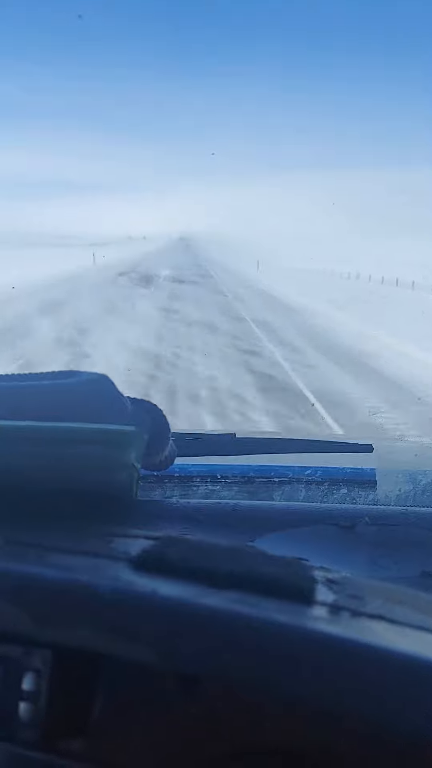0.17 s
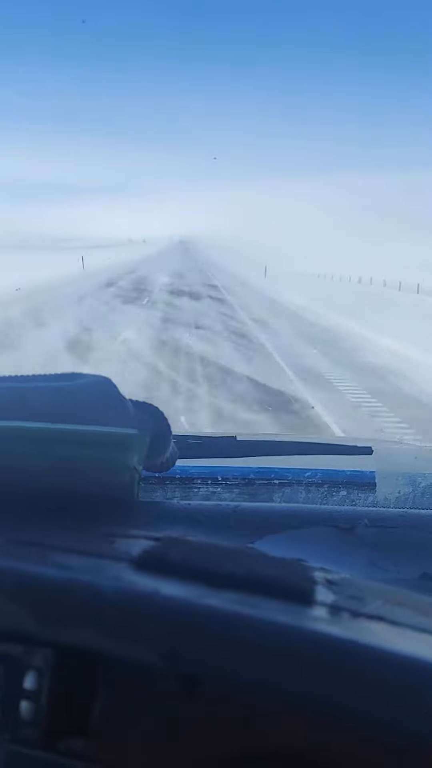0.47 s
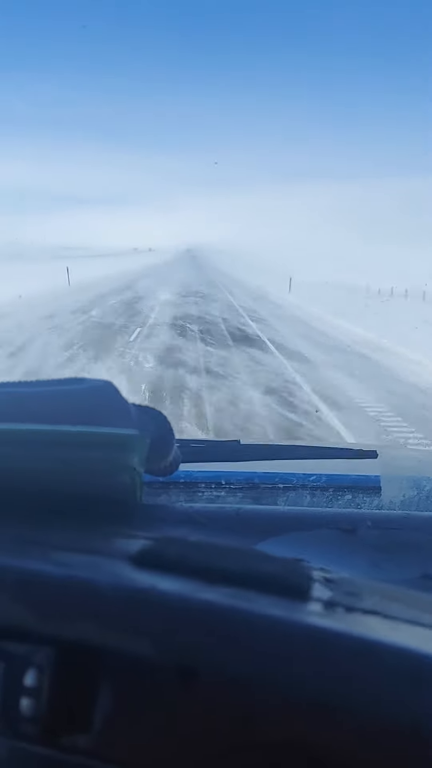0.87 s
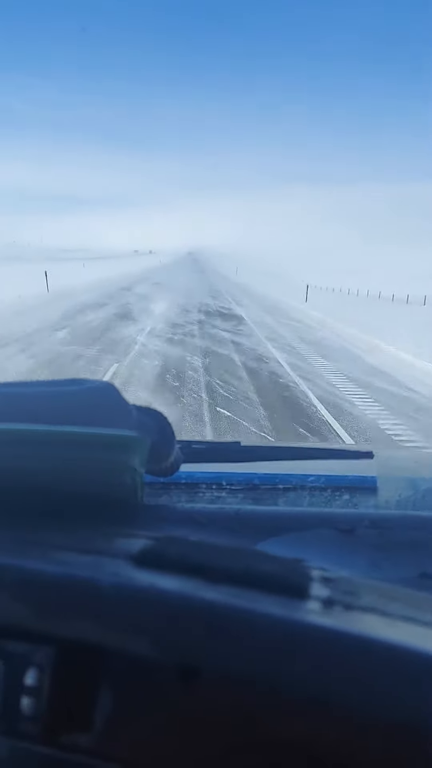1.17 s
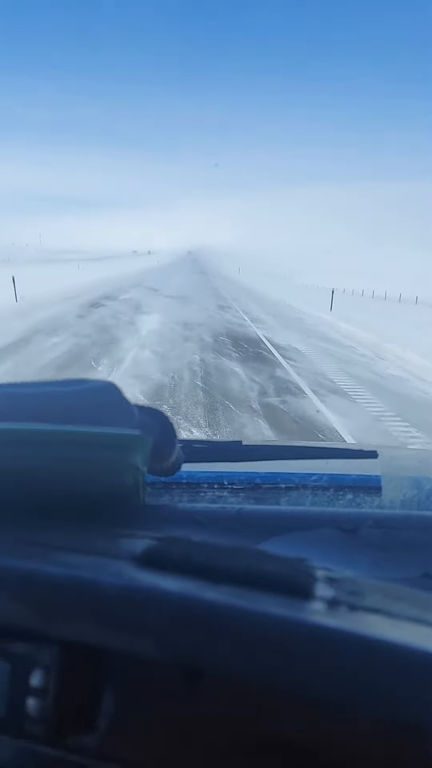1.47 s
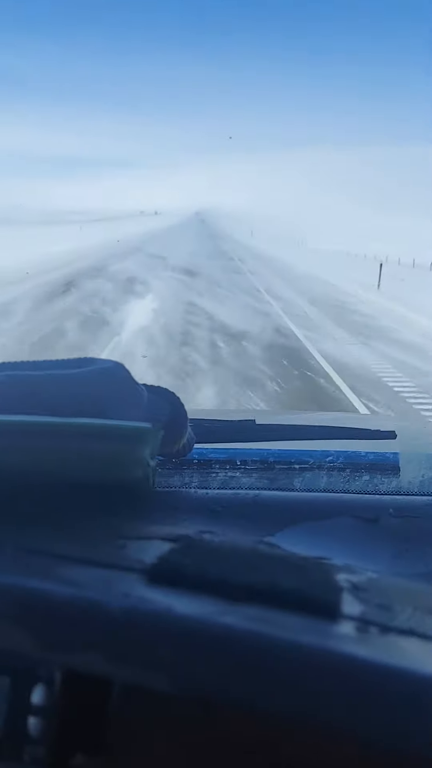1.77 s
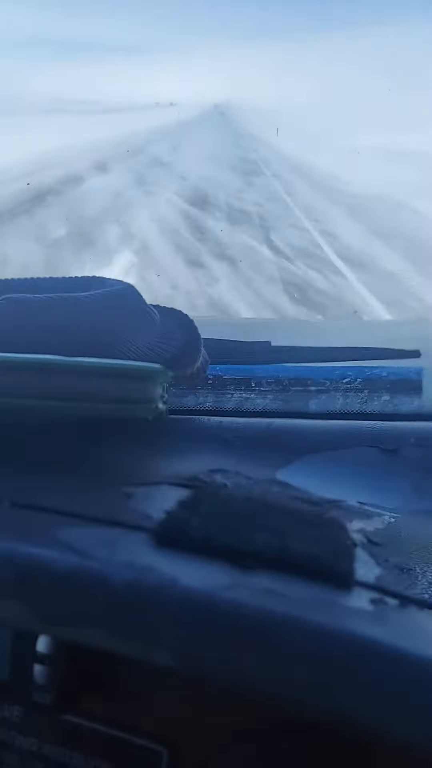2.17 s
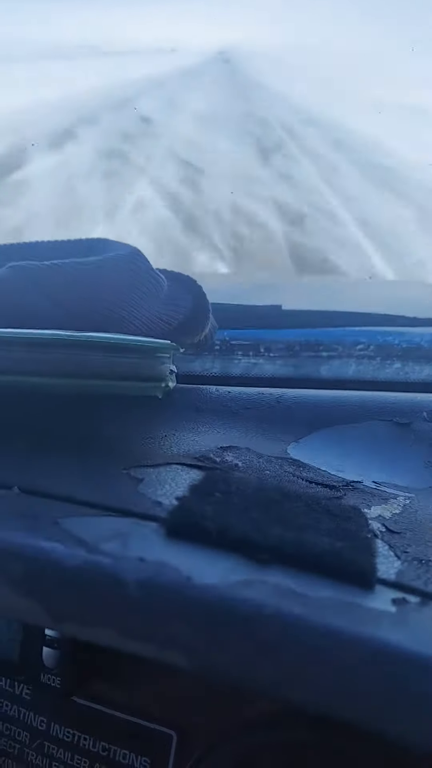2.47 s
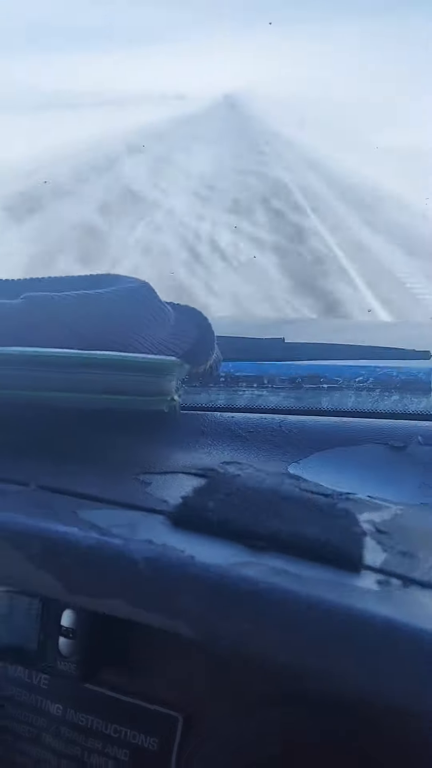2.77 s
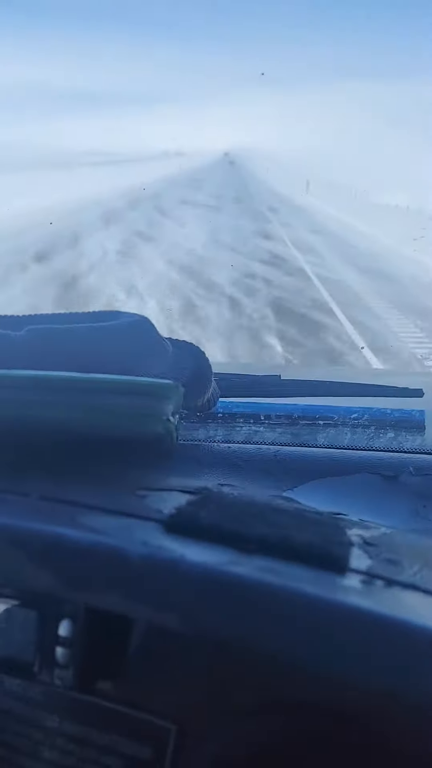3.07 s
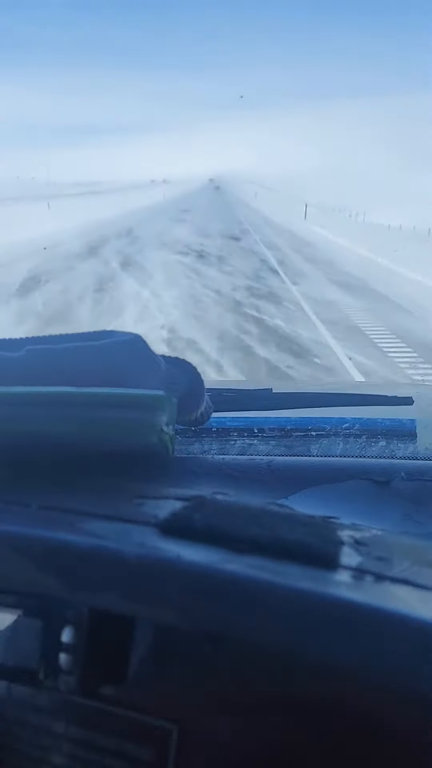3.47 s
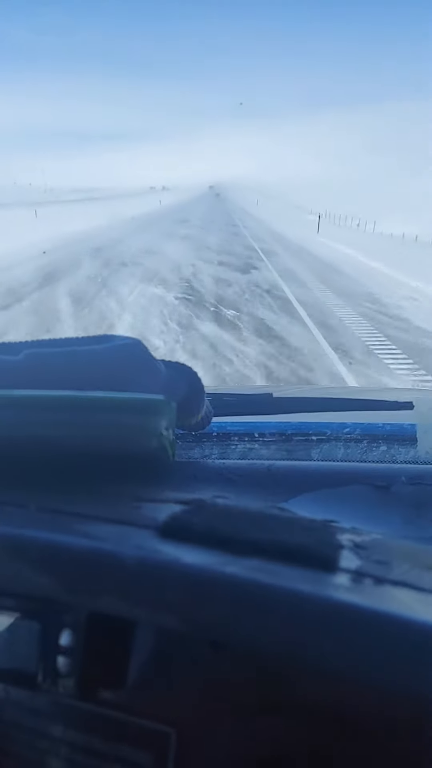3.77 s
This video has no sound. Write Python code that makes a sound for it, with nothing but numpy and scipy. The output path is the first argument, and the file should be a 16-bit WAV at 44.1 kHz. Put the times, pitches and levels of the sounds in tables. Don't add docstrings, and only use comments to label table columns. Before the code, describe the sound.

Steady low engine drone in a truck cab on a snowy road, with broad wind and tyre noise and faint hiss; later, close handling clicks and a single thump strike the stereo microphone's right side.

```python
import sys
import numpy as np
from scipy import signal
from scipy.fft import rfft, irfft, next_fast_len
from scipy.io import wavfile
from scipy.ndimage import uniform_filter1d, map_coordinates

SR = 44100
rng = np.random.default_rng(int(sys.argv[2]) if len(sys.argv) > 2 else 0)


def invert_db(x):
    u = np.asarray(x, float) / 20
    return 10 ** u


def master(y):
    cut = np.clip(np.atleast_2d(y).T, -1, 1)
    pcm = np.round(cut * 32767)
    wavfile.write(sys.argv[1], SR, pcm.astype(np.int16))


N = 172872

# time in seconds, turns per second in Hz.
CRANK_SPEED = [(0, 21.36), (2, 21.33), (3.92, 21.28)]
# pitch as a multiple of the crank turns, level in dB.
ENGINE_TONES = [(0.5, -48.5), (1, -40), (1.5, -27), (2, -22), (2.5, -25), (3, 0), (3.5, -21.5), (4, -22),
                (4.5, -14), (5, -14.5), (5.5, -18.5), (6, -27), (6.5, -21), (7, -14.5), (7.5, -18.5),
                (8, -22.5), (8.5, -24.5), (9, -18.5), (9.5, -29.5), (10, -29.5), (10.5, -33), (11, -26.5),
                (11.5, -27), (12, -24.5), (12.5, -32.5), (13, -32), (13.5, -42), (14, -37.5), (14.5, -46),
                (15, -44.5), (15.5, -30), (16, -27)]
# pitch as a multiple of the crank turns, level in dB.
HIGH_ENGINE_TONES = [(17, -32.5), (17.5, -30.5), (22.5, -33.5), (24, -35.5), (25.5, -36), (28.5, -41.5)]
# time in seconds, level in dB.
ROAD_LEVEL = [(.12, -29.5), (.2, -27.5), (.35, -29.5), (.55, -32), (.8, -34.5), (1.3, -34), (1.9, -32),
              (2.3, -34.5), (2.8, -36), (3.3, -34.5), (3.92, -34)]
# frequency in Hz, level in dB per Hz.
RUMBLE_COLOUR = [(25, -37.5), (45, 0.5), (60, 1.5), (85, -10.5), (110, -4), (165, -7), (215, -11),
                 (330, -33.5), (600, -64.5)]
# frequency in Hz, level in dB per Hz.
RUSH_COLOUR = [(150, -32.5), (250, -3), (300, -12.5), (500, -11.5), (700, -18.5), (1100, -20.5),
               (2300, -29), (3200, -39.5), (6000, -55.5)]
# frequency in Hz, level in dB per Hz.
HISS_COLOUR = [(1500, -20.5), (3000, 0.5), (4500, -1), (7500, -7.5), (10000, -15), (12500, -9.5),
               (15500, -27), (16500, -35)]
# frequency in Hz, width in Hz, boost in dB.
CAB_PANELS = [(476, 30, 4.5), (1030, 270, 2.5)]
# frequency in Hz, likeness from 0 to 1.
PORT_LIKENESS = [(60, 0.58), (150, 1), (380, 0.6), (950, 0.37), (2380, 0.02), (5980, 0.046), (15000, 0.066)]
# frequency in Hz, left minus right in dB.
PORT_LEAN = [(60, -0.5), (180, -1), (550, -1.5), (1650, -4), (4970, 0.5), (15000, 1)]
# start in seconds, level in dB, left minus right in dB, case resonance in Hz,
# brightness in dB per octave.
CASE_TICKS = [(1.6035, -42.5, -14, 3000, -5.5), (1.611, -28, -17.5, 6850, 0), (1.6222, -34, -16, 4000, -7),
              (1.6273, -42, -18, 14000, 0), (1.6578, -43, -6, 4200, 0), (1.704, -44, -5, 3420, -3),
              (1.751, -43, -16, 7500, 2), (1.7785, -40.5, -4, 4000, -1), (1.7943, -38.5, -9, 3900, -2.5),
              (1.7998, -40, -14, 11400, -1), (1.809, -44.5, -6, 4050, -2.5),
              (1.9853, -44, -19, 14350, 3.5), (2.0251, -23, -18.5, 12200, -1.5),
              (2.0892, -43, -7, 7500, -1), (2.1454, -25.5, -11.5, 12200, 1),
              (2.1639, -33, -12.5, 12500, -2), (2.188, -29, -7, 4030, -1), (2.1988, -47, -3.5, 8000, 3),
              (2.231, -27, -10, 4150, -1), (2.2391, -26, -12.5, 6900, 2.5),
              (2.37, -29, -7, 4200, -3.5), (2.3714, -38.5, -11, 8200, -2), (2.4005, -40, -8, 8000, -3),
              (2.4277, -18.5, -21, 5400, 3), (2.4789, -24.5, -17, 7000, 2), (2.523, -47, -7, 7500, -2.5),
              (2.536, -26, -14.5, 5500, 3.5), (2.629, -25.5, -17, 4200, 1.5),
              (2.6478, -39, -11, 3000, -2.5), (2.7013, -38.5, -11, 7500, -1),
              (2.7069, -52, -11.5, 7000, -3), (2.7322, -34, -15.5, 3500, -4),
              (2.7607, -27, -15.5, 8600, 1.5), (2.8268, -43.5, -9, 4000, -6.5),
              (2.898, -32.5, -10, 6000, -1.5), (2.9644, -43, -4, 14800, 0.5), (3.0067, -45.5, -7, 5000, -3),
              (3.0221, -38, -6.5, 8500, 2), (3.0858, -27, -12.5, 3800, -4.5),
              (3.122, -41.5, -17, 8300, -2.5)]
# frequency in Hz, level in dB.
CASE_COLOUR = [(880, -21), (1500, 1), (4900, -2), (5640, -1.5), (6490, -6.5), (8010, -2.5), (10500, -13),
               (13100, -3), (16500, -22)]
# start in seconds, peak level in dB, left minus right in dB,
# ring frequency in Hz, cycles it takes to die.
SEAM_SNAPS = [(1.6574, -33, 20, 5000, 2), (1.7039, -30, 20, 5000, 2), (1.78, -20, 14, 5500, 2),
              (1.7953, -21.5, 12, 5500, 2), (1.8095, -23, 10, 4500, 2), (2.023, -17.5, 20, 4500, 3),
              (2.1461, -18.5, 20, 4000, 3), (2.1643, -16.5, -24, 2800, 1.5), (2.369, -22.5, 17, 5000, 2),
              (2.6492, -19, -27, 3200, 2), (2.701, -24, 12, 5500, 2), (2.8986, -18, 16.5, 5500, 2),
              (3.006, -31, 14, 5000, 2), (3.0227, -36, 14, 7000, 2), (3.0878, -17.5, -19, 2700, 5)]
# frequency in Hz, level in dB per Hz.
SHAKE_COLOUR = [(120, -30), (300, -4), (700, -1), (1400, -2), (2600, -16), (5000, -40.5)]

LEFT_RIGHT = np.array([[1], [-1]])


def unit(x):
    return x / np.sqrt(np.mean(x ** 2) + 1e-20)


def along(points, hz):
    f, v = np.transpose(points)
    return np.interp(np.log(hz + 1), np.log(f + 1), v)


def curve(rows):
    s, v = np.transpose(rows)
    return np.interp(np.arange(N) / SR, s, v)


def wobble(rate):
    return map_coordinates(rng.standard_normal(400), [np.arange(N) * rate / SR])


def filtered(x, response):
    m = next_fast_len(x.shape[-1] + 8192)
    spectrum = rfft(x, m) * response(np.fft.rfftfreq(m, 1 / SR))
    return irfft(spectrum, m)[..., :x.shape[-1]]


def lean_gain(hz):
    return invert_db(along(PORT_LEAN, hz) / 2 * LEFT_RIGHT)


def crank():
    return 2 * np.pi * np.cumsum(curve(CRANK_SPEED)) / SR


def engine():
    firing_db, boom_sway_db, sway_db = -15, 0.5, 3
    drift_rad, spread_rad = 0.67, 0.39
    out = np.zeros((2, N))
    top_db = max(db for _, db in ENGINE_TONES)
    angle = crank()
    for order, db in ENGINE_TONES + HIGH_ENGINE_TONES:
        firing = db == top_db
        sway = (boom_sway_db if firing else sway_db) * wobble(5.025)
        drift = drift_rad * wobble(4.03) * (.2 if firing else 1 + order / 12)
        phase = order * angle + rng.uniform(0, 2 * np.pi) + drift
        hz = order * CRANK_SPEED[0][1]
        apart = rng.standard_normal() * spread_rad * hz / 100 * LEFT_RIGHT / 2
        level = np.sqrt(2) * invert_db(firing_db + db - top_db + sway)
        out += level * lean_gain(hz) * np.sin(phase + apart)
    return out


def rush(spectrum, patchy_db, bumps=()):
    z = signal.stft(rng.standard_normal((2, N)), nperseg=512)[2]
    field = uniform_filter1d(rng.standard_normal(z.shape[1:]), size=6, axis=0)
    field = uniform_filter1d(field, size=10, axis=1)
    pair = signal.istft(z * invert_db(patchy_db * unit(field)), nperseg=512)[1][:, :N]

    def colour(hz):
        peaks = sum(db / (1 + (2 * (hz - c) / w) ** 2) for c, w, db in bumps)
        turn = np.arccos(np.clip(along(PORT_LIKENESS, hz), -1, 1)) / 2
        return invert_db(along(spectrum, hz) + peaks) * np.array([np.cos(turn), np.sin(turn)])

    mid, side = filtered(pair, colour)
    return unit(filtered(np.array([mid + side, mid - side]), lean_gain))


def road():
    rumble_db, rush_db, hiss_db = -25, 3, -20
    rumble_grows, hiss_grows = 1, 0.86
    clatter = 0.062
    glass_top_hz = 15800
    level_db = curve(ROAD_LEVEL)
    mean_db = level_db[SR // 2:].mean()
    swell_db = level_db - mean_db + .5 * wobble(8.63)
    angle = crank()
    gate = 1 + clatter * np.cos(3 * angle) + clatter / 2 * np.cos(angle + 1.0)

    rumble_gain = invert_db(rumble_db + rumble_grows * swell_db + 2.0 * wobble(9.6))
    rumble = rumble_gain * rush(RUMBLE_COLOUR, patchy_db=1.64)
    body_gain = invert_db(mean_db + rush_db + swell_db) * gate
    body = body_gain * rush(RUSH_COLOUR, patchy_db=1.05, bumps=CAB_PANELS)
    hiss_gain = invert_db(mean_db + hiss_db + hiss_grows * swell_db + 1.3 * wobble(13)) * gate
    hiss = hiss_gain * rush(HISS_COLOUR, patchy_db=0.5)
    return filtered(rumble + body + hiss, lambda hz: hz < glass_top_hz)


def ticks():
    rise_s, hold_s, t60_s, tick_db = .0001, 0.00069, 0.0077, 1
    tail_db, tail_t60_s, far_lag_s = -24, .06, .0006
    ring_db, ring_width = 6.5, 0.065
    out, t = np.zeros((2, N + SR)), np.arange(4096) / SR
    u = np.maximum(t - [[far_lag_s], [0]], 0)
    crackle = invert_db(-60 * np.maximum(u - hold_s, 0) / t60_s)
    tail = invert_db(tail_db - 60 * u / tail_t60_s)
    shape = (1 - np.exp(-u / rise_s)) * (crackle + tail)
    for s, db, pan_db, ring_hz, tilt_db in CASE_TICKS:

        def colour(hz):
            tilt = tilt_db * np.log2((hz + 1) / 7000)
            ring = ring_db / (1 + ((hz / ring_hz - 1) / ring_width) ** 2)
            return invert_db(along(CASE_COLOUR, hz) + tilt + ring)

        burst = shape * filtered(rng.standard_normal((2, len(t))), colour)
        size = np.sqrt(np.sum(burst ** 2, axis=1, keepdims=True) / (.003 * SR))
        gain = invert_db(db + tick_db + np.array([[pan_db], [0]]))
        out[:, round(s * SR):][:, :len(t)] += gain * burst / size
    return out[:, :N]


def snaps():
    out, t = np.zeros((2, N)), np.arange(256) / SR
    for s, db, pan_db, ring_hz, cycles in SEAM_SNAPS:
        fade = invert_db(-30 * (t * ring_hz - .25) / cycles)
        ring = np.sin(2 * np.pi * ring_hz * t) * fade
        gain = invert_db(db + np.minimum([[pan_db], [-pan_db]], 0))
        out[:, round(s * SR):][:, :len(t)] += gain * ring
    return out


def thump():
    knock_s, knock_db, width_s, pan_db = 2.1631, -5.5, .0003, -22
    shake_db, lead_s, shake_t60_s = -30, .012, .1
    late = np.arange(N) / SR - knock_s
    after = np.maximum(late, 0)
    u = after / width_s
    push = (1 - np.exp(-2 * u)) * np.exp(-u / 3) * 1.6
    rebound = 1.05 * np.sin(np.minimum(u / 21, 1) * np.pi) ** 2
    swell = np.clip(1 + late / lead_s, 0, 1)
    shake = swell * invert_db(shake_db - 60 * after / shake_t60_s) * rush(SHAKE_COLOUR, patchy_db=2)
    return invert_db(knock_db + np.array([[pan_db], [0]])) * (push - rebound) + shake


def scene():
    left_lead_s = .00013
    cab = filtered(engine() + road(), lambda hz: np.exp(1j * np.pi * hz * left_lead_s * LEFT_RIGHT))
    return cab + ticks() + snaps() + thump()


def top_cut(x):
    return signal.sosfilt(signal.butter(12, 16660, fs=SR, output="sos"), x)


def record(dry):
    start_s, fade_s, mic_low_hz, top_hz = .1255, .012, 40, 16660
    cut_end_s, cut_hz, cut_gain_db = .34, 84, 4.5
    settle_db, settle_s = 4.5, 0.1
    t = np.arange(N) / SR
    dry = filtered(dry, lambda hz: 1 / np.sqrt(1 + (mic_low_hz / (hz + 1)) ** 8))

    def bass_cut(hz):
        lift = invert_db(cut_gain_db / (1 + (hz / 250) ** 4))
        return lift / np.sqrt(1 + (cut_hz / (hz + 1)) ** 6)

    cut = filtered(dry, bass_cut)
    low = filtered(dry, lambda hz: 1 / (1 + (hz / 200) ** 4))
    extra_db = settle_db * np.exp(-np.maximum(t - cut_end_s, 0) / settle_s)
    settled = dry + low * (invert_db(extra_db) - 1)
    free = np.clip((t - cut_end_s) / 0.0046, 0, 1)
    fade_in = np.clip((t - start_s) / fade_s, 0, 1)
    mix = (free * settled + (1 - free) * cut) * fade_in
    return top_cut(filtered(mix, lambda hz: hz < top_hz))


dry = scene()
out = record(dry)
master(out)
```